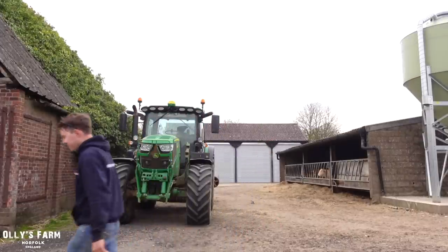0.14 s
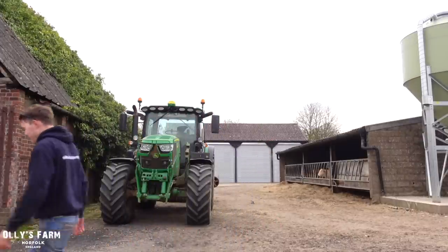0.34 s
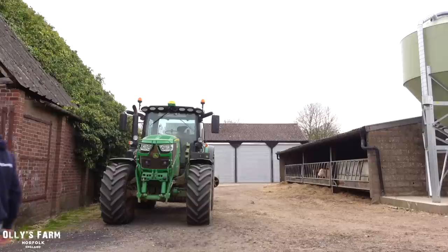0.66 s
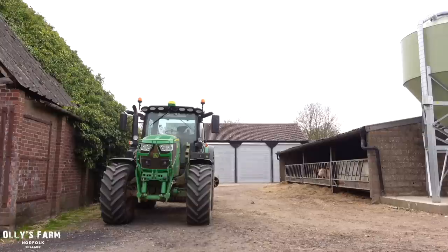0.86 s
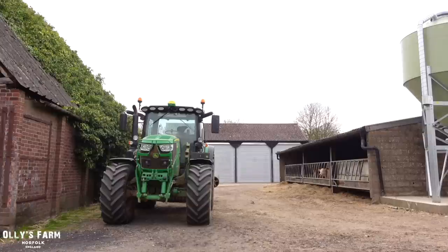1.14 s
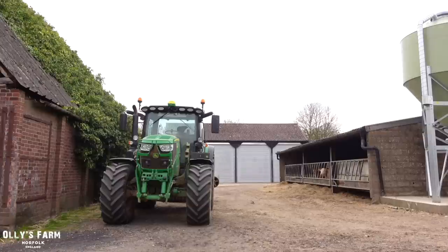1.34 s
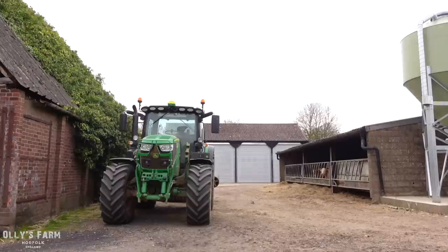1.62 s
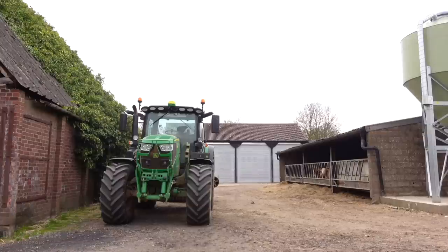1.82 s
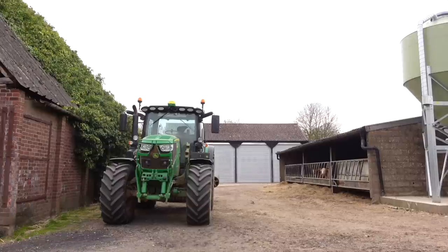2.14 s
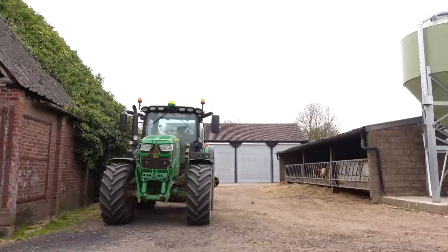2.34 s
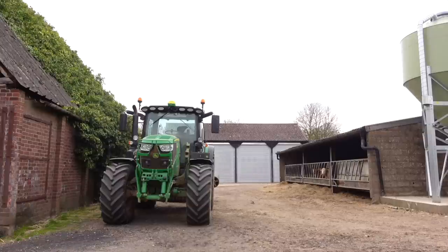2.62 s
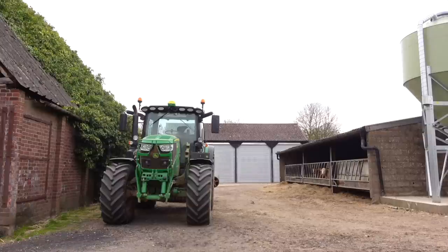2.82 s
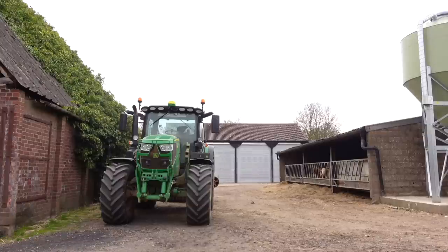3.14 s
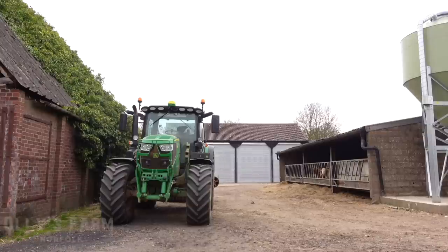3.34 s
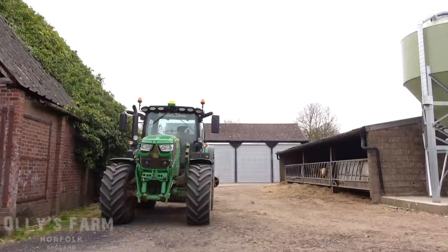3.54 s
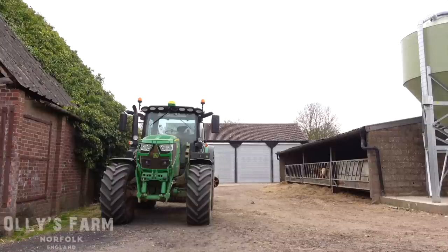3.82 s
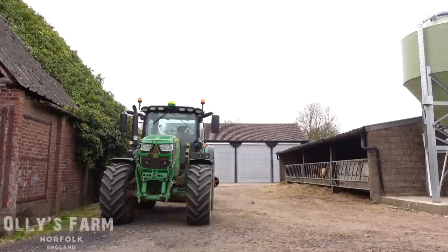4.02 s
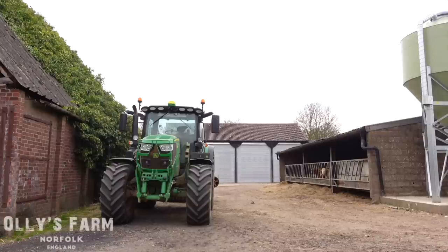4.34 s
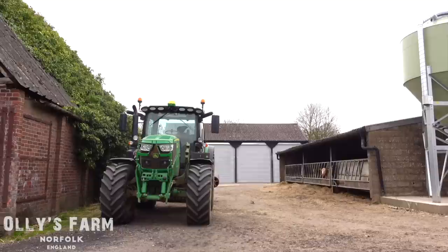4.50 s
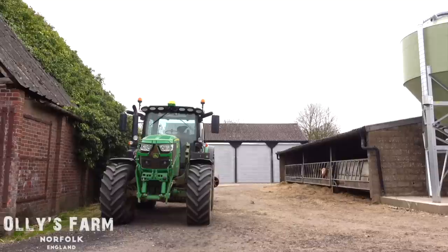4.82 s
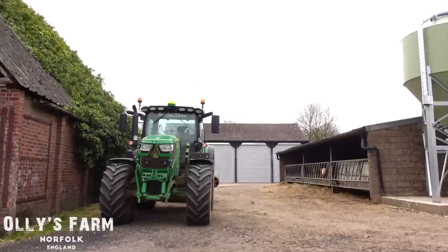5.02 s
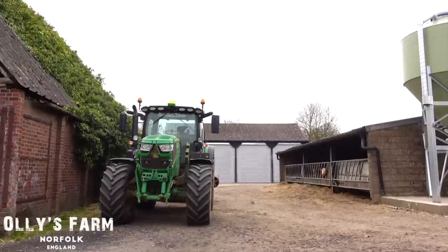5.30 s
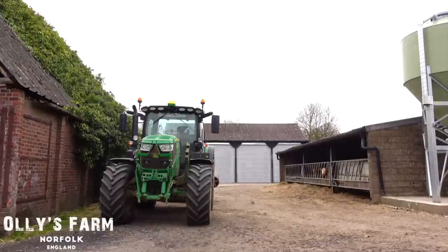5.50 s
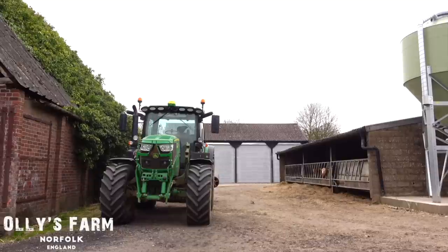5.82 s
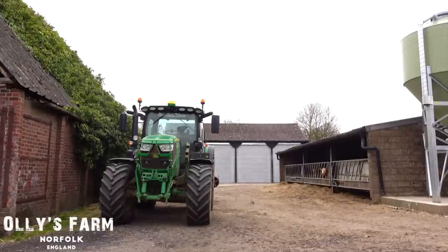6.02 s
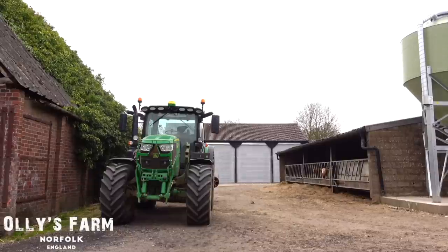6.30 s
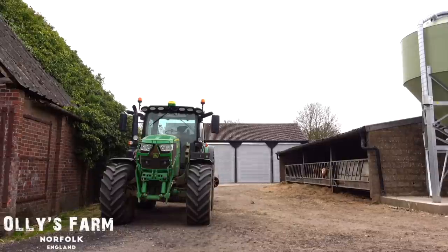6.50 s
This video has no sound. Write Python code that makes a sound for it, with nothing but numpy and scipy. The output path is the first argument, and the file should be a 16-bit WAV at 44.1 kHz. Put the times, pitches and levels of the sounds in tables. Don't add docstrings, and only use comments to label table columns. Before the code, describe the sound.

Close boots crunch on gritty concrete, stones snapping and heels thudding as the walker leaves left. A cow starts a soft nasal hum, breaks to a lower growl, then opens into a loud, deep moo lasting under a second. Brick walls return echoes and a short tail. Afterwards crows caw, small birds trill and distant hooves scuff straw over air hiss, a shed fan's drone and wind rumbling on the microphone.

```python
import sys
import numpy as np
from scipy import signal
from scipy.fft import rfft, irfft
from scipy.io import wavfile
from scipy.ndimage import uniform_filter1d, map_coordinates

SR = 44100
rng = np.random.default_rng(int(sys.argv[2]) if len(sys.argv) > 2 else 0)


def dump_mix(stems):
    frames = np.atleast_2d(stems).T
    limited = np.clip(frames, -1, 1)
    pcm = np.round(limited * 32767).astype(np.int16)
    wavfile.write(sys.argv[1], SR, pcm)


def boost_factor(decibels):
    exponent = np.asarray(decibels, float) / 20
    return 10 ** exponent


N = 293706

# (time [s], pitch [Hz])
HUM_PITCH = [
    (1.93, 116),
    (2.2, 130),
    (2.29, 149.5),
]
GROWL_PITCH = [
    (2.315, 103.5),
    (2.425, 105.4),
    (2.56, 110),
    (2.69, 115.3),
]
CALL_PITCH = [
    (2.78, 124),
    (2.89, 132.3),
    (3.0, 143),
    (3.164, 146.6),
    (3.262, 143.9),
    (3.4, 142),
    (3.474, 132.8),
    (3.502, 123.2),
    (3.55, 100),
]
# (time [s], level [dB])
HUM_EFFORT = [(1.9, -61), (2.0, -51), (2.11, -33), (2.3, -32), (2.45, -29), (2.58, -27.5), (2.755, -30.5)]
CALL_EFFORT = [(2.79, -21.5), (2.9, -20.5), (3.0, -20), (3.07, -17.5), (3.27, -19), (3.4, -22), (3.47, -25),
               (3.54, -28), (3.6, -40)]
# (time [s], opening [-1 to 3], breath share [0-1])
HUM_JAW = [
    (2.3, -1, .3),
    (2.4, -1, .16),
    (2.53, -1, .14),
    (2.74, 0, .2),
]
CALL_JAW = [
    (2.79, 1, .06),
    (2.95, 1, .05),
    (3.04, 2, .04),
    (3.4, 2, .04),
    (3.51, 3, .07),
    (3.58, 3, .25),
]
# (frequency [Hz], width [Hz], level [dB])
THROAT_SHUT = [(285, 310, -2), (680, 170, -13), (935, 160, -10), (1660, 360, -12.5), (1940, 240, -2),
               (2650, 190, -8), (2865, 150, -7), (4300, 250, -28)]
THROAT_PARTING = [(285, 310, -2), (800, 250, -10), (960, 200, -12), (1660, 360, -10), (1900, 260, -4),
                  (2600, 220, -15), (2865, 150, -20), (4300, 250, -28)]
THROAT_HALF = [(274, 114, -2.5), (397, 130, -13.5), (936, 450, -15), (1534, 184, -8.5), (1902, 170, -6),
               (2654, 210, -26), (3210, 350, -32), (4185, 320, -33.5)]
THROAT_WIDE = [(273.6, 140, -1), (433, 150, -24), (590, 90, -22), (1060, 1100, -13.5), (1590, 200, -2),
               (1930, 200, -5), (2650, 280, -25), (3250, 220, -23), (3650, 240, -31), (4270, 130, -27),
               (6270, 250, -42)]
THROAT_CLOSING = [(273, 140, -1), (400, 150, -20), (780, 300, -8), (1170, 300, -4), (1500, 300, -5),
                  (1850, 250, -13), (2550, 250, -15), (3150, 260, -20), (3650, 300, -27), (4270, 170, -34)]

# (time [s], peak [dB], centre [Hz])
SNAPS = [(0.017, -15, 1750), (0.075, -17, 2140), (0.125, -20, 3890), (0.138, -16, 2450), (0.167, -15, 2640),
         (0.206, -18, 1800), (0.509, -16.5, 3330), (0.6345, -11.5, 2400), (0.6435, -12, 2300),
         (0.659, -8, 1400), (0.6745, -12, 2500), (0.688, -15.5, 2700), (0.712, -23, 1570),
         (0.756, -28.5, 2530), (0.973, -10, 2700), (1.142, -15.5, 1370), (1.246, -17, 3010),
         (1.2515, -8, 1500), (1.279, -20.5, 1720), (1.324, -24.5, 1660), (1.397, -19, 1580),
         (1.424, -24.5, 1390), (1.644, -18.5, 5350), (1.65, -20.5, 2080), (1.679, -23, 1900),
         (1.882, -20, 1400), (4.328, -31, 4500), (4.44, -30, 3500), (4.492, -23.5, 2300),
         (0.001, -24, 1560), (0.0469, -29, 2320), (0.0634, -31, 3300), (0.1138, -29, 3700),
           (0.1331, -24, 3500), (0.1451, -20, 2690), (0.1519, -20, 3000), (0.484, -27, 2000),
           (0.6273, -16, 2200), (0.6982, -22, 2200), (0.8287, -27, 1730), (0.9469, -27, 2200),
           (0.9753, -12, 2000), (0.9856, -25, 2800), (1.0075, -24, 2800), (1.0215, -30, 1500),
           (1.1075, -21, 2830), (1.1681, -23, 2080), (1.1764, -24, 2400), (1.2865, -26, 1600),
           (1.2999, -26, 1600), (1.3778, -29, 1600), (1.5166, -31, 1500), (1.6952, -25, 3000),
           (1.7087, -30, 3000)]
# (time [s], peak [dB], centre [Hz], sharp tick [dB])
GRIT_CRACKS = [(0.0922, -25, 6740, -30), (0.2154, -31, 5560, -27), (0.3721, -28, 4570, -37),
               (0.573, -19, 1540, -14), (0.601, -10, 3300, -17), (0.6095, -36, 3300, -22),
               (1.102, -21, 2850, -26), (1.1462, -30, 6500, -24), (1.1886, -25, 5430, -44),
               (1.352, -21, 1870, -28), (1.636, -29, 2080, -22.5), (2.0304, -26.5, 4850, -26.5),
               (2.095, -17, 4100, -17), (2.106, -17, 3730, -29), (2.124, -18, 4130, -36),
               (2.153, -20.5, 3780, -28), (2.2167, -20, 3480, -28), (2.7362, -31, 5000, -50),
               (2.799, -25.5, 3740, -41)]
# (time [s], peak [dB])
SHARDS = [(0.0609, -38), (0.0828, -33), (0.1128, -35), (0.1211, -32), (0.127, -24), (0.1338, -27),
          (0.1457, -30), (0.1505, -29), (0.1661, -20), (0.2073, -30), (0.3399, -39), (0.3671, -41),
          (0.5745, -19), (0.5865, -34), (0.6013, -13), (0.6089, -26), (0.622, -35), (0.6341, -29),
          (0.6435, -30), (0.6589, -24), (0.6737, -31), (0.6865, -34), (0.7109, -35), (0.7195, -41),
          (0.9466, -37), (0.9637, -32), (0.9746, -23), (1.0022, -37), (1.0458, -37), (1.1136, -30),
          (1.1325, -38), (1.1721, -35), (1.1839, -31), (1.1927, -31), (1.2293, -36), (1.2509, -25),
          (1.2795, -33), (1.2988, -37), (1.5125, -44), (1.6924, -40), (1.7035, -39), (3.4797, -42),
          (3.5741, -47), (3.6624, -41), (4.6104, -34)]
# (time [s], peak [dB], pitch [Hz])
HEELS = [
    (0.0755, -17, 233),
    (0.188, -17, 215),
    (0.341, -27, 134),
    (1.14, -20, 300),
    (1.2, -21, 185),
    (5.235, -24, 240),
]
# (time [s], length [s], crunch [dB], body [dB])
SOLES = [
    (0.117, 0.16, -39, -30),
    (0.58, 0.19, -37.5, -27.5),
    (0.972, 0.097, -41, -29),
    (1.11, .15, -39, -33),
    (1.277, 0.18, -46, -33),
    (1.642, .12, -36, -33),
    (2.099, 0.19, -34, -70),
    (2.776, .15, -48, -70),
]
# (frequency [Hz], level [dB])
CRUNCH_HIGH = [(2500, -6), (4500, 10.5), (8000, 4.5), (12000, -5.5), (16000, -6)]
CRUNCH_BODY = [(400, -27), (900, 18.5), (1700, 25.5), (2800, 25.5), (4200, 12), (6500, -50)]
# (time [s], length [s], level [dB])
SCUFFS = [
    (5.34, 0.07, -33),
    (5.555, 0.05, -39),
    (5.68, .06, -43),
    (6.375, 0.1, -35),
]
# (frequency [Hz], level [dB])
STRAW = [(1200, -24), (2700, -4), (4300, 0), (5800, -14), (9000, -13), (15000, -15)]

# (delay [s], left [dB], right [dB])
ECHOES = [
    (.0023, -18, -13.5),
    (.0061, -12, -10),
    (.011, -12, -9),
    (.023, -18.5, -18),
    (0.046, -21.5, -26.5),
    (0.082, -30, -28),
    (.131, -15, -19.5),
]
# (frequency [Hz], T60 [s])
TAIL_DECAY = [(150, 0.69), (400, 0.83), (1200, 0.65), (2500, 0.5), (5000, .6), (12000, 0.17)]
# (frequency [Hz], level [dB])
TAIL_TONE = [(100, -12), (350, -11), (600, -10), (1000, -4), (1700, -4), (2600, 1), (5000, -3)]
# (frequency [Hz], level [dB], T60 [s])
SHED_MODES = [
    (271, -39, 1.3),
    (278, -41.5, 1.2),
]

# (time [s], length [s], pitch [Hz], level [dB])
TRILLS = [
    (0.37, .23, 3750, -39),
    (5.6, .3, 3800, -33.5),
    (6.53, .15, 3850, -39),
]
CROWS = [
    (4.66, 0.29, 2055, -33),
    (5.02, .22, 2060, -34),
    (5.5, 0.21, 2260, -36),
]
SQUEAKS = [
    (0.8, 0.14, 4200, -49),
    (1.85, .21, 4260, -49),
]

# (time [s], level [dB])
AUTO_GAIN = [(0.0, -48), (0.55, -49.5), (0.74, -52), (1.2, -50), (1.35, -56), (1.84, -51), (2.65, -52),
             (2.84, -54.5), (3.47, -58), (4.13, -51), (4.99, -45), (5.3, -43.5), (5.71, -45), (6.66, -46.5)]
# (frequency [Hz], level [dB])
AIR = [(200, -41.5), (400, 4), (800, 1), (1500, -3), (3000, -6.5), (6000, -12.5), (15500, -20.5),
       (17000, -42)]
WIND = [(15, -45), (59, -20), (96, -8.5), (200, -5.5), (340, -12), (420, -26.5), (550, -13.5), (920, -120)]
# (frequency [Hz], width [Hz], level [dB])
FAN_DUCT = [
    (496.4, 22, 2),
    (1051, 146, -14),
    (1610, 340, -17),
]
# (time [s], peak [dB], decay [dB/s])
GUSTS = [
    (0.19, -37, 21),
    (1.146, -38, 95),
    (1.64, -43.5, 5),
    (2.4, -39, 14),
    (4.49, -38.5, 10),
    (4.75, -38, 3),
    (5.25, -34, 15),
    (5.79, -37.5, 14),
    (6.47, -28.5, 18),
]
# (frequency [Hz], left-right likeness [0-1])
LIKENESS = [(60, 0.95), (130, 0.9), (290, 0.78), (640, 0.68), (1410, 0.41), (3100, 0.55), (6820, 0.92),
            (15000, 1)]


def moo():
    pitch, = curves(HUM_PITCH + GROWL_PITCH + CALL_PITCH)
    mouth_db, = curves(HUM_EFFORT + CALL_EFFORT)
    jaw, breath = curves(HUM_JAW + CALL_JAW)

    chest_hz, chest_width_hz, boost_db, thins_db = 281.5, 11.5, 17.5, 3.5
    skirt = 4.2
    detune = np.maximum(2 * pitch - chest_hz, (chest_hz - 2 * pitch) / skirt)
    boom_db = boost_db / (1 + (2 * detune / chest_width_hz) ** 4) - thins_db
    chest_db = mouth_db - 1 + np.clip(jaw / 2, 0, 1) * boom_db

    nose_shut_db, nose_open_db, nose_holds = -2, -28, 0.3
    nose_db = chest_db + nose_shut_db + (nose_open_db - nose_shut_db) * np.clip(jaw - nose_holds, 0, 1)

    phase = 2 * np.pi * np.cumsum(pitch * (1 + 0.024 * breath * wobble(70))) / SR
    pulses = unit(np.sin(55.5 * phase) / (2 * np.sin(phase / 2) + 1e-9) - 0.5 - np.cos(phase))
    puffs = unit(rng.standard_normal(N) * (1 + np.cos(phase)) ** 2)
    folds = pulses * boost_factor(4.8 * breath * wobble(90)) + breath * puffs

    voice = np.zeros(N)
    shapes = (THROAT_SHUT, THROAT_PARTING, THROAT_HALF, THROAT_WIDE, THROAT_CLOSING)
    for opening, modes in enumerate(shapes, start=-1):
        share = np.clip(1 - np.abs(jaw - opening), 0, 1)
        voice += share * unit(coloured(folds, throat(modes))[0])
    voice = unsteady(voice, depth_db=1.3)

    chest = signal.sosfiltfilt(signal.butter(2, 620, fs=SR, output="sos"), voice)
    call = boost_factor(chest_db - 1.55) * levelled(chest) + boost_factor(mouth_db - 1.25) * levelled(voice - chest)
    nose = boost_factor(nose_db + 4.0) * np.sin(phase)
    return gate(HUM_EFFORT + CALL_EFFORT, fade=0.036) * (call + nose)


def throat(modes):
    hz = np.geomspace(30, 20000, 600)
    power = sum(boost_factor(2 * db) / (1 + (2 * (hz - c) / w) ** 2) ** 2.2 for c, w, db in modes)
    return np.transpose([hz, 10 * np.log10(power)])


def unsteady(x, depth_db):
    z = signal.stft(x, nperseg=1024)[2]
    drift = uniform_filter1d(rng.standard_normal(z.shape), size=4, axis=0)
    drift = uniform_filter1d(drift, size=14, axis=1)
    return signal.istft(z * boost_factor(depth_db * unit(drift)), nperseg=1024)[1][:N]


def levelled(x):
    return x / np.sqrt(np.abs(uniform_filter1d(x ** 2, size=1800)) + 1e-6)


def yard(x, wet_db):
    hz, t, z = signal.stft(rng.standard_normal((2, SR)), SR, nperseg=256)
    decay = boost_factor(-60 * t / along(TAIL_DECAY, hz)[:, None])
    tail = signal.istft(z * decay, SR, nperseg=256)[1]
    strength = np.linalg.norm(tail[0])
    tail = coloured(tail, TAIL_TONE)[:, :tail.shape[1]]
    tail = np.pad(boost_factor(wet_db) * tail / strength, ((0, 0), (1500, 0)))
    tail[1] = 1.09 * tail[0] + 0.26 * tail[1]
    t = np.arange(tail.shape[1]) / SR
    for hz, db, t60 in SHED_MODES:
        tail += boost_factor(db - 39 - 60 * t / t60) * np.sin(2 * np.pi * hz * t)
    for s, left_db, right_db in ECHOES:
        tail[:, round(s * SR)] += boost_factor([left_db, right_db])
    tail[:, 0] = 1
    return signal.fftconvolve(x[None], tail, axes=1)[:, :N]


def boots():
    return stones() + heels() + soles()


def stones():
    out, t = np.zeros((2, N + 1024)), np.arange(1024) / SR
    tick_under_db = -36
    cracks = [(s, db, hz, db + tick_under_db) for s, db, hz in SNAPS] + GRIT_CRACKS
    for s, db, hz, tick_db in cracks:
        t60 = np.abs(0.013 + 0.0003 * (db + 20))
        burst = rng.standard_normal(len(t)) * boost_factor(-60 * t / t60)
        snap = panned(boost_factor(db) * band(burst, hz / 1.5, hz * 1.35), walker_pan_db(s))
        place(out, s, snap + boost_factor(tick_db) * band(burst, 6500, 16000))
    for s, db in SHARDS:
        burst = rng.standard_normal(len(t)) * boost_factor(-60 * t / 0.015)
        place(out, s, panned(boost_factor(db - 1.5) * band(burst, 4800, 8700), walker_pan_db(s)))
    return out[:, :N]


def walker_pan_db(s):
    start_db, db_per_s, max_db, scatter_db = 0.5, 3.5, 7, 2
    return min(start_db + db_per_s * s, max_db) + scatter_db * rng.standard_normal()


def heels():
    out, t = np.zeros((2, N + 1024)), np.arange(1024) / SR
    cycles = 1.9
    for s, db, hz in HEELS:
        shape = np.exp(-(t * hz / cycles) ** 4) * (1 - np.exp(-t / 0.0015))
        place(out, s, boost_factor(db) * shape * np.sin(2 * np.pi * hz * t))
    return out[:, :N]


def soles():
    grains = rng.standard_normal((2, N)) * boost_factor(4.2 * wobble(600) + 1.2 * wobble(90))
    grains[1] = 0.75 * grains[0] + 0.43 * grains[1]
    high, body = unit(coloured(grains, CRUNCH_HIGH)), unit(coloured(grains, CRUNCH_BODY))
    straw = unit(coloured(rng.standard_normal(N) * boost_factor(2.5 * wobble(150)), STRAW))
    out = np.zeros((2, N))
    for s, length, crunch_db, body_db in SOLES:
        out += roll(s, length) * (boost_factor(crunch_db) * high + boost_factor(body_db - 4) * body)
    for s, length, db in SCUFFS:
        out += roll(s, length) * boost_factor(db) * straw
    return out


def roll(s, length):
    shape = [(s - 0.02, -26), (s, 0), (s + length / 2, -5.5), (s + length, -21.5)]
    return gate(shape) * boost_factor(curves(shape)[0])


def caller(calls, buzz_hz, depth, blur, peak_at, start_db, end_db, slide):
    out = np.zeros(N)
    for s, length, centre_hz, top_db in calls:
        shape = [(s, 1 - slide, start_db), (s + peak_at * length, 1, 0), (s + length, 1, end_db)]
        bend, swell_db = curves(shape)
        level = boost_factor(top_db + swell_db - 1.5 + 1.1 * wobble(49))
        chop = 1 + depth * np.cos(2 * np.pi * np.cumsum(buzz_hz * (1 + 0.17 * wobble(7.7))) / SR)
        hz = centre_hz * bend * (1 + blur * wobble(300))
        out += gate(shape) * level * chop * np.sin(2 * np.pi * np.cumsum(hz) / SR)
    return out


def background():
    gain_db, = curves(AUTO_GAIN)
    hiss = rush(lambda hz: boost_factor(along(AIR, hz)), patchy_db=1.9)
    return boost_factor(gain_db + 9.5 + 0.93 * wobble(6)) * hiss + fan(gain_db) + wind()


def fan(gain_db):
    t = np.arange(N) / SR
    surge_db, surge_s, peak_s = 2.5, 2.39, 2.21
    drone_db = -41 + 0.16 * (gain_db - gain_db.mean())
    drone_db = drone_db + surge_db * np.cos(2 * np.pi * (t - peak_s) / surge_s)

    def duct(hz):
        return sum(boost_factor(db) / (1 + (2 * (hz - c) / w) ** 2) for c, w, db in FAN_DUCT)

    noise = boost_factor(drone_db + 1.2 * wobble(5)) * rush(duct, patchy_db=1.2)
    blade_hz, blade_db = 497 + 7 * wobble(25), -9 + 1.5 * wobble(12)
    return noise + boost_factor(drone_db + blade_db) * np.sin(2 * np.pi * np.cumsum(blade_hz) / SR)


def wind():
    t = np.arange(N) / SR
    rise_db_per_s, calm_db = 143, -50
    gusts = [db - np.maximum(dying * (t - s), rise_db_per_s * (s - t)) for s, db, dying in GUSTS]
    level = boost_factor(np.maximum(np.max(gusts, axis=0), calm_db))
    return level * rush(lambda hz: boost_factor(along(WIND, hz)), patchy_db=1.9)


def rush(gain, patchy_db):
    hz, _, z = signal.stft(rng.standard_normal((2, N)), SR, nperseg=2048)
    patches = uniform_filter1d(rng.standard_normal(z.shape[1:]), size=14, axis=0)
    patches = uniform_filter1d(patches, size=3, axis=1)
    turn = np.arccos(np.clip(along(LIKENESS, hz), -1, 1)) / 2
    mid_side = gain(hz) * np.array([np.cos(turn), np.sin(turn)])
    z = z * boost_factor(patchy_db * unit(patches)) * mid_side[:, :, None]
    mid, side = signal.istft(z, SR, nperseg=2048)[1][:, :N]
    return unit(np.array([mid + side, mid - side]))


def unit(x):
    return x / np.sqrt(np.mean(x ** 2) + 1e-20)


def along(points, hz):
    f, v = np.transpose(points)
    return np.interp(np.log(hz + 1), np.log(f + 1), v)


def curves(rows):
    s, *cols = np.transpose(rows)
    return [np.interp(np.arange(N) / SR, s, c) for c in cols]


def gate(rows, fade=0.005):
    t = np.arange(N) / SR
    return np.clip(np.minimum(t - rows[0][0], rows[-1][0] - t) / fade, 0, 1)


def wobble(rate):
    knots = rng.standard_normal(int(N * rate / SR) + 4)
    return map_coordinates(knots, [np.arange(N) * rate / SR])


def coloured(x, points):
    hz = np.fft.rfftfreq(8192, 1 / SR)
    cep = irfft(np.log(boost_factor(along(points, hz)) + 1e-6))
    cep[1:4096] *= 2
    cep[4097:] = 0
    pulse = irfft(np.exp(rfft(cep)))[:4096]
    return signal.fftconvolve(np.atleast_2d(x), pulse[None], axes=1)[:, :N]


def band(x, lo_hz, hi_hz):
    x = signal.sosfilt(signal.butter(2, [lo_hz, hi_hz], "band", fs=SR, output="sos"), x)
    return x / np.abs(x).max()


def panned(x, pan_db):
    return x * np.array([[boost_factor(pan_db / 2)], [boost_factor(-pan_db / 2)]])


def place(out, s, x):
    start = round(s * SR)
    out[:, start:start + x.shape[-1]] += x


def scene():
    cow = panned(yard(moo(), wet_db=-8), -0.5)
    trills = caller(TRILLS, buzz_hz=76.6, depth=0.46, blur=0.03, peak_at=0.49,
                    start_db=-6, end_db=-14, slide=0.03)
    crows = caller(CROWS, buzz_hz=140, depth=0.61, blur=0.11, peak_at=0.192,
                   start_db=-13, end_db=-15, slide=0.04)
    steel = caller(SQUEAKS, buzz_hz=30, depth=0.2, blur=0.0049, peak_at=0.79,
                   start_db=-12, end_db=-2.5, slide=0.001)
    return cow + boots() + panned(trills, 4.0) + crows + steel + background()


def roll_off(x):
    return signal.sosfilt(signal.butter(12, 16500, fs=SR, output="sos"), x)


def record(dry):
    mix = signal.sosfilt(signal.butter(2, 45, "high", fs=SR, output="sos"), dry)
    mix = mix / (1 + np.abs(mix / 0.85) ** 8) ** 0.125
    mix = signal.sosfiltfilt(signal.cheby2(12, 40, 16300, fs=SR, output="sos"), mix)
    return roll_off(mix)


dry = scene()
out = record(dry)
dump_mix(out)
```